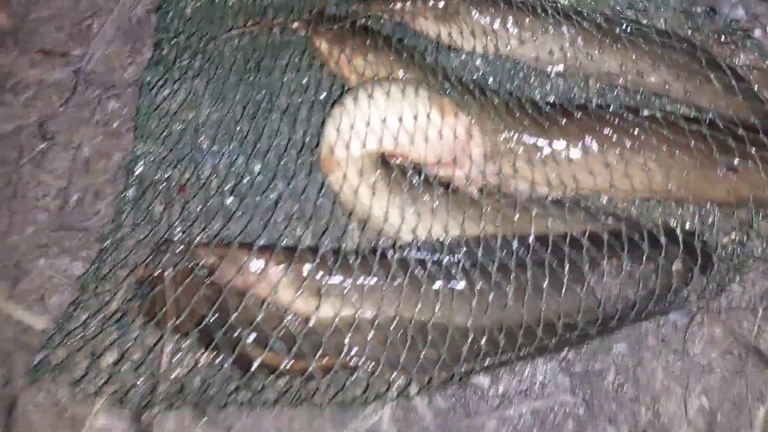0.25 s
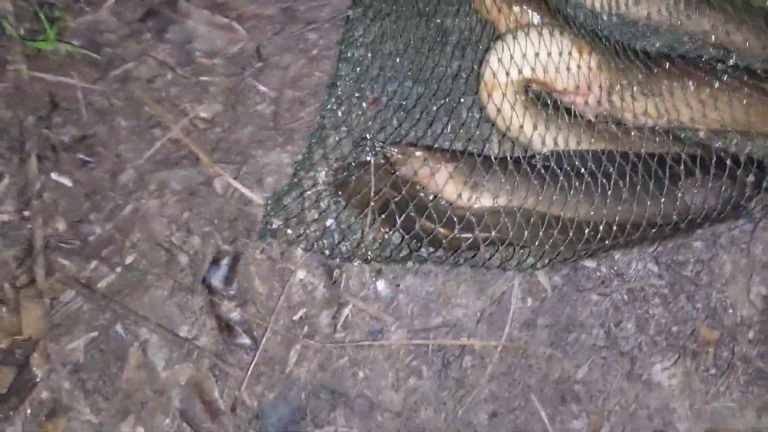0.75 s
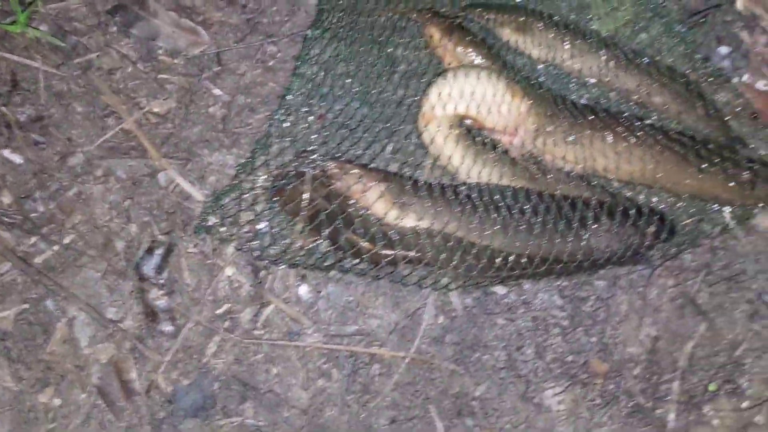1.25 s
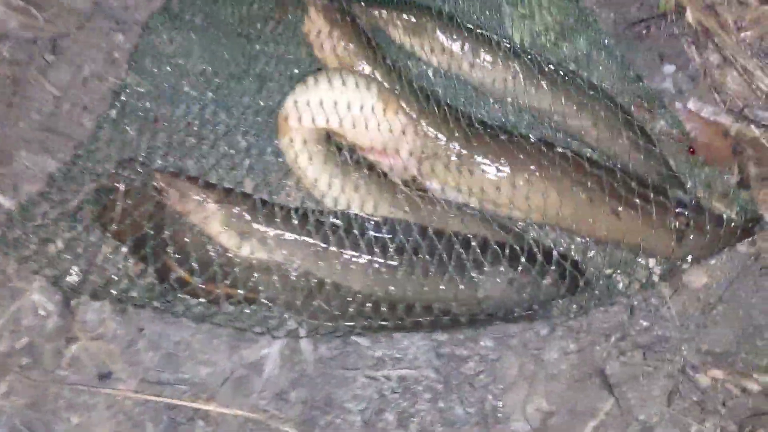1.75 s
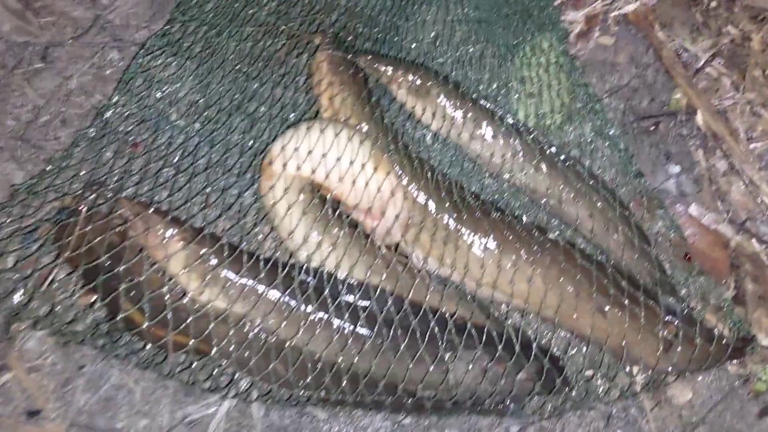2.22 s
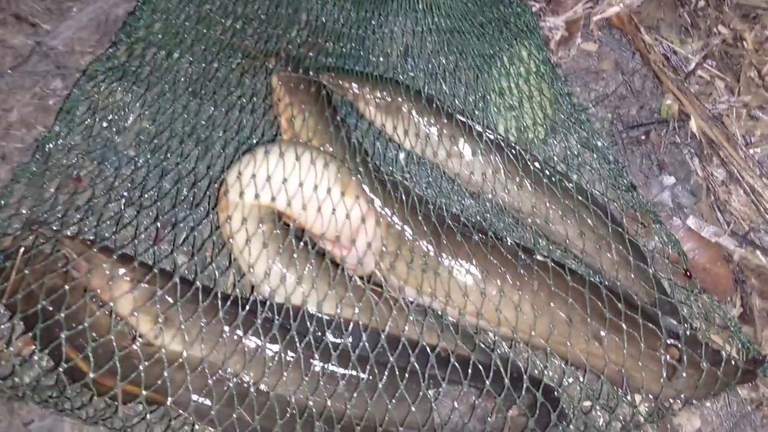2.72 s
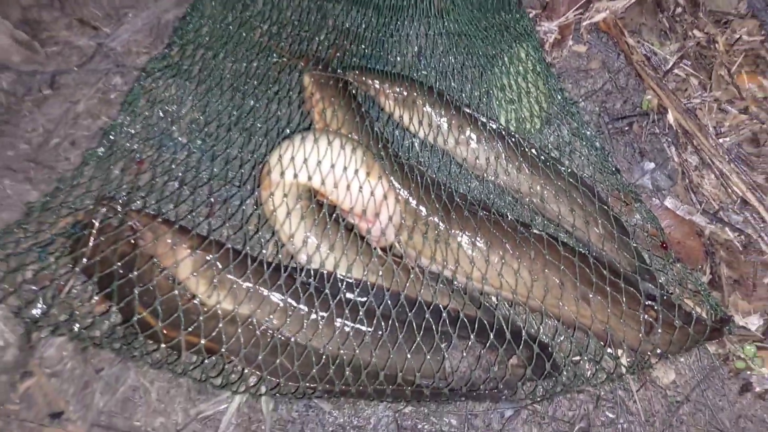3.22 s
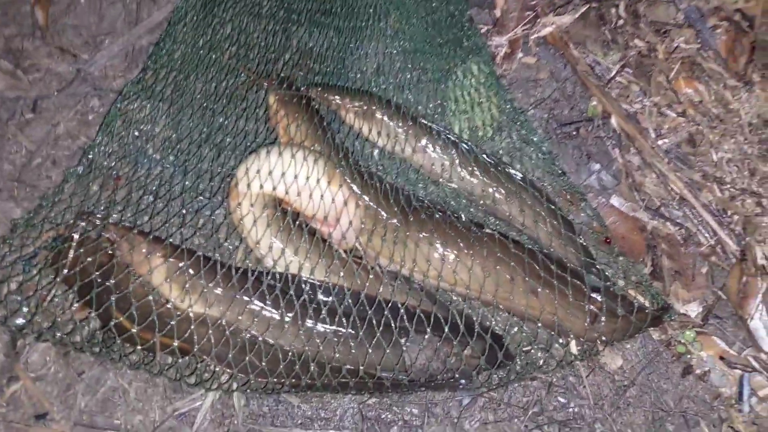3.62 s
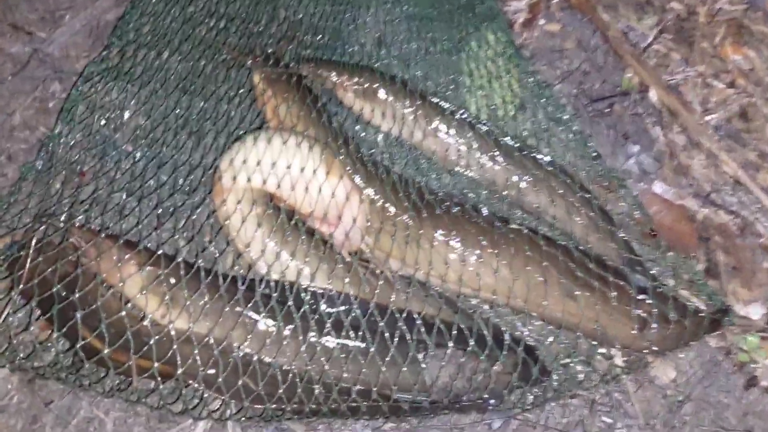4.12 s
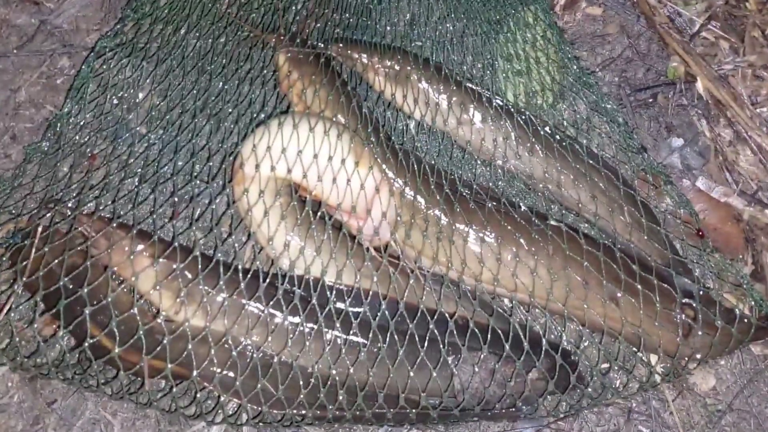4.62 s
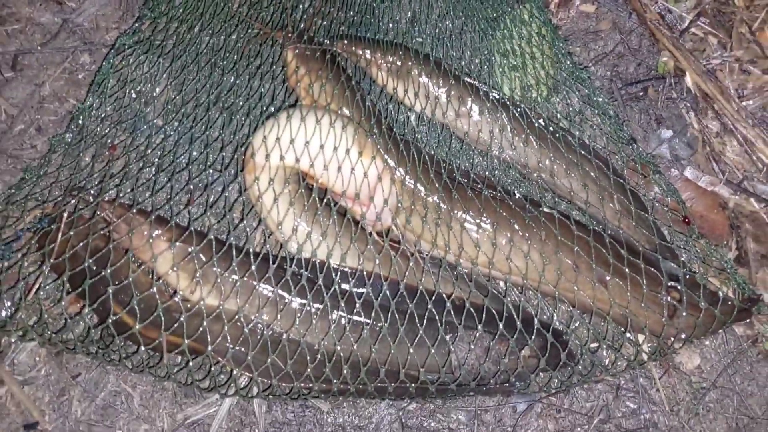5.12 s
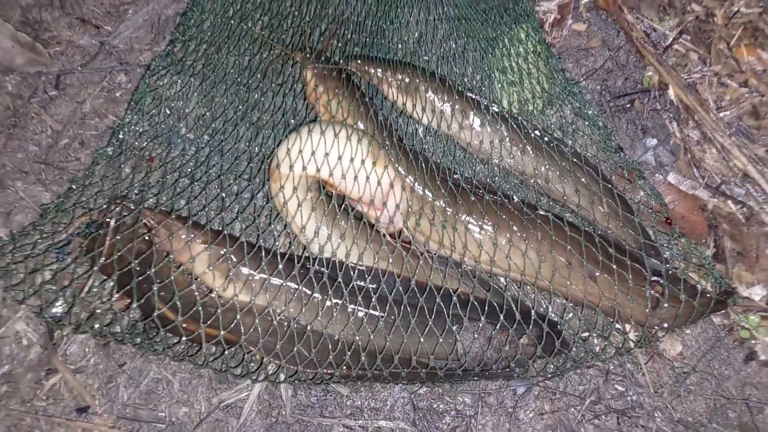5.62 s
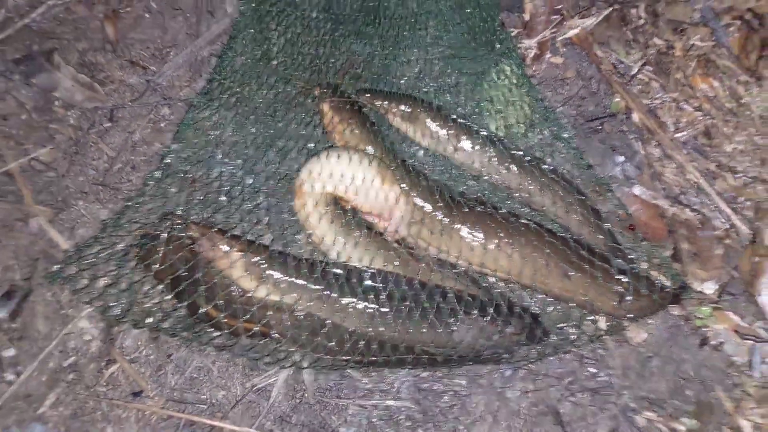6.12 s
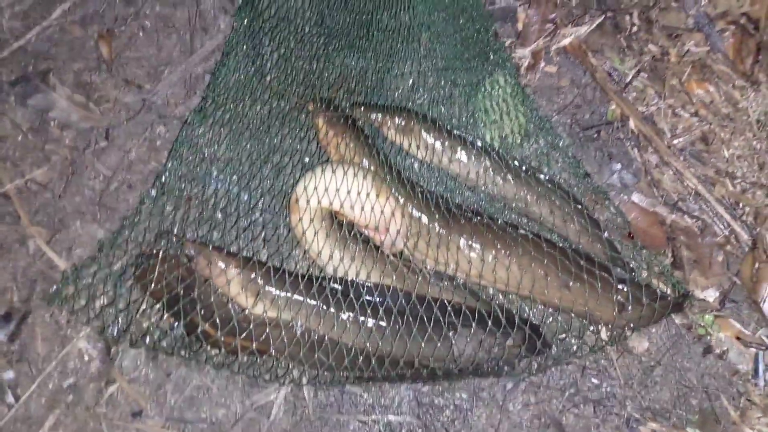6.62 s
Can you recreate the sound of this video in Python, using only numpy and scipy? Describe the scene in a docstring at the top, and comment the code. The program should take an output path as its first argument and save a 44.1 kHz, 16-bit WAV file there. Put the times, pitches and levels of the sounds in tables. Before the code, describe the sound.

Small frogs close by take turns giving short, high rattling chirps, about eight a second, each from a slightly different direction. Behind them are a cricket's even trill, a far chorus of frogs and insects, and a faint engine drone with a low rumble. Fingers tap and rub the hand-held microphone in the first two seconds. Near the end a bigger frog gives three lower croaks. It is night, outdoors by the water.

```python
"""Small frogs take turns giving short rattling chirps by the water at night, each from its own direction:
trains of glottal pulses excite the damped resonances of vocal sac and throat. Behind them are a far
chorus of frogs and insects, a cricket's wing strokes, a distant engine's drone and a low rumble.
Fingers tap and rub the hand-held recorder, whose two microphones sit a few centimetres apart,
and near the end a bigger frog croaks at lower resonances."""
import sys
import numpy as np
from scipy import signal
from scipy.fft import rfft, irfft, next_fast_len
from scipy.io import wavfile
from scipy.ndimage import uniform_filter1d, map_coordinates

SR = 44100
rng = np.random.default_rng(int(sys.argv[2]) if len(sys.argv) > 2 else 0)


def log_audio(samples):
    """Write samples as a 16-bit WAV file to the path given in sys.argv[1]."""
    # one column per channel
    frames = np.atleast_2d(samples).T
    # limit to full scale, then quantise
    limited = np.clip(frames, -1, 1)
    pcm = np.round(limited * 32767).astype(np.int16)
    wavfile.write(sys.argv[1], SR, pcm)


N = 302702
TIME = np.arange(N) / SR


def amp(db):
    return 10 ** (np.asarray(db) / 20)

def unit_rms(x):
    return x / np.sqrt(np.mean(x ** 2) + 1e-20)

def along(points, hz):
    """Interpolation of (Hz, value) points on a logarithmic frequency axis."""
    freqs, values = np.transpose(points)
    return np.interp(np.log(hz + 1), np.log(freqs + 1), values)

def curves(rows):
    """Linear interpolation in time: one envelope for each column after the first."""
    times, *columns = np.transpose(rows)
    return [np.interp(TIME, times, column) for column in columns]

def wobble(rate):
    """Smooth random modulation with `rate` knots a second."""
    return map_coordinates(rng.standard_normal(int(N * rate / SR) + 4), [TIME * rate])

def filtered(x, response):
    """Zero-phase filtering: the spectrum times a frequency response."""
    size = next_fast_len(N + SR // 2)
    return irfft(rfft(x, size) * response(np.fft.rfftfreq(size, 1 / SR)), size)[..., :N]

def ring(t, hz, db, t60, attack_s):
    """A damped mode struck at t = 0, decaying 60 dB in t60 seconds."""
    t = np.maximum(t, 0)
    return amp(db - 60 * t / t60) * np.sin(2 * np.pi * hz * t) * (1 - np.exp(-t / attack_s)) ** 2

def add(out, start_s, sound):
    """Superposition of a sound on the mix."""
    part = out[..., round(start_s * SR):][..., :sound.shape[-1]]
    part += sound[..., :part.shape[-1]]


# Reverberation of reeds and bank. Each row: frequency in Hz, t60 in seconds.
BANK_DECAY = [(1500, 0.73), (4000, 0.48), (8000, 0.3)]

def scatter(x, build_s=0.0069):
    """Diffuse reflection: reeds and bank return a tail that builds, then decays exponentially."""
    hz, t, noise = signal.stft(rng.standard_normal((2, SR // 4)), SR, nperseg=256)
    decay = amp(-60 * t / along(BANK_DECAY, hz)[:, None])
    onset = 1 - np.exp(-(t / build_s) ** 2)
    tail = signal.istft(noise * decay * onset, SR, nperseg=256)[1]
    return signal.fftconvolve(x[None], tail / np.linalg.norm(tail[0]), axes=1) * amp([[-1.8], [1.8]])

def small_body(hz):
    """Radiation efficiency: a small frog emits little below its throat modes or far above its sac."""
    return 1 / np.sqrt((1 + (1360 / (hz + 1)) ** 24) * (1 + (hz / 6200) ** 8))

# The chirps. Each row: start in seconds, frog, first pulse's gain in dB, number of pulses.
CHIRPS = [(0, "a", -6, 5), (0.1236, "a", -8, 6), (0.2428, "a", -7.5, 6), (0.3699, "a", -8.5, 7),
          (.491, "a", -8, 5), (.6167, "a", -7, 5), (0.7384, "a", -7, 5), (0.8572, "a", -7.5, 6),
          (0.9852, "a", -8.5, 6), (1.207, "b", -20, 10), (1.331, "b", -16, 5), (1.346, "b", -8.5, 9),
          (1.4669, "b", -4.5, 7), (1.619, "b", -5, 7), (1.7862, "b", -7.5, 9), (1.9494, "b", -10.5, 9),
          (2.112, "b", -11, 10), (2.2739, "b", -7.5, 8), (2.3936, "c", -10.5, 6), (2.454, "b", -7, 8),
          (2.5339, "c", -9.5, 6), (2.6789, "c", -9, 6), (2.826, "c", -8.5, 6), (2.9728, "c", -9.5, 7),
          (3.121, "c", -8, 6), (3.2647, "c", -9, 5), (3.4167, "c", -9, 5), (3.5602, "c", -9, 6),
          (3.7131, "c", -10, 6), (3.863, "c", -10.5, 7), (3.9837, "d", -14, 8), (4.0179, "c", -8.5, 5),
          (4.1038, "d", -5.5, 4), (4.223, "d", -6.5, 5), (4.3412, "d", -8.5, 6), (4.466, "d", -7.5, 5),
          (4.5875, "d", -7.5, 6), (4.7088, "d", -7, 5), (4.826, "d", -7.5, 6), (4.9446, "d", -6.5, 5),
          (5.0672, "d", -7, 5), (5.1883, "d", -9.5, 5), (5.306, "d", -9, 5), (5.423, "d", -10, 5),
          (5.5343, "d", -10.5, 5), (5.6448, "d", -11.5, 4), (5.7555, "d", -10, 5), (5.8615, "d", -10, 4),
          (5.9739, "d", -10, 5), (6.0827, "d", -9, 6), (6.187, "d", -5.5, 5), (6.299, "d", -9, 5),
          (6.3611, "e", -14, 7), (6.4011, "d", -7.5, 4), (6.5122, "d", -7, 3), (6.5252, "e", -8.5, 6),
          (6.6301, "d", -8.5, 5), (6.656, "e", -7, 7), (6.7627, "d", -7.5, 4), (6.795, "e", -7.5, 7)]
# The near frogs. Each entry: reference time in seconds, pitch in Hz, its drift in Hz/s, pulse gap in ms,
# throat gain in dB, its drift in dB/s, lag at the left microphone in ms.
FROGS = dict(a=(0.5, 3995, -3, 3, -13, 0, -0.0126), b=(1.8, 3883.5, 70, 3, -15.5, -2.5, 0.246),
         c=(2.5, 3696, -82, 3.5, -24, -6, -.135), d=(4, 3877, 30, 2.5, -13, 0.5, -0.0396),
         e=(7, 3836, -50, 2.5, -11.5, -1.5, 0.0663))
# The hand slowly turns the recorder. Each row: time in seconds, added left lag in ms.
RECORDER_TURN = [(0, 0.0094), (.95, 0.056), (1.45, 0.02), (2.2, 0.11), (4, .15), (5.15, .19), (5.6, 0.14),
                 (6.86, .13)]
# Vocal sac resonances. Each row: multiple of the pitch, gain in dB, t60 in seconds.
SAC_MODES = [(1, 3, 0.0098), (1.12, -3, 0.005), (.88, -5, 0.0042)]
# The bright edge of a pulse. Each row: frequency in Hz, gain in dB, t60 in seconds.
SNAP_MODES = [(4800, -25, 0.0021), (5460, -15, 0.0036), (5900, -20.5, 0.0026)]
# Throat resonances. Each row: frequency in Hz, gain in dB, t60 in seconds.
THROAT_MODES = [(1623, -11, 0.034), (1895, 0, 0.014), (2456, 3.5, 0.011)]

def small_frogs(jitter_ms=0.15, slowing=1.15, tiring_db=4, attack_s=0.00027, damping_t60=0.0015,
                aim_db_per_ms=52, left_db=-4, shade_db=-6, echo_db=-6):
    """Impulse excitation: glottal pulses, slowing and weakening, ring the vocal sac and throat."""
    out, t = np.zeros((2, N)), np.arange(SR // 16) / SR
    for start, frog, db, pulses in CHIRPS:
        reference_s, pitch, drift_hz, gap_ms, throat_db, drift_db, lag_ms = FROGS[frog]
        pitch += drift_hz * (start - reference_s)
        throat_db += drift_db * (start - reference_s)
        lag_ms += np.interp(start, *np.transpose(RECORDER_TURN))
        k = np.arange(pulses)[:, None]
        progress = k / k[-1]
        # Random deviations: entry k is for one pulse, the last for the whole chirp.
        timing, force, tuning, edge = rng.standard_normal((16, 4)).T
        length_ms = gap_ms * k[-1] * (1 + 0.0408 * timing[-1])
        age = t - (length_ms * progress ** slowing + jitter_ms * timing[k] * (k > 0)) / 1000
        sac_hz = pitch * (1 + 0.029 * tuning[k] + 0.0072 * tuning[-1])
        sac = sum(ring(age, sac_hz * ratio, gain, t60, attack_s) for ratio, gain, t60 in SAC_MODES)
        sac[:-1] *= amp(-60 * np.maximum(age[1:], 0) / damping_t60)  # each pulse damps the one before
        aim_db = aim_db_per_ms * lag_ms  # brighter along the microphones' axis
        snap = sum(ring(age, hz * (1 + 0.058 * edge[k]), gain + aim_db, t60, attack_s)
                   for hz, gain, t60 in SNAP_MODES)
        throat = sum(ring(age, hz, gain + throat_db, t60, 0.002) for hz, gain, t60 in THROAT_MODES)
        strength = amp(db - tiring_db * progress + 0.95 * force[k])
        call = ((sac + snap + throat) * strength).sum(axis=0)
        # The case shades the left microphone's treble.
        shaded = ((sac + amp(shade_db) * snap + throat) * strength).sum(axis=0)
        add(out[1], start, call)
        add(out[0], start + max(lag_ms, 0) / 1000, shaded * amp(left_db + 0.49 * edge[0]))
        add(out, start, amp(echo_db) * scatter(call))
    return filtered(out, small_body)


# The left microphone is less sensitive. Each row: frequency in Hz, left minus right in dB.
SENSITIVITY_GAP = [(60, -12), (180, -8.5), (550, -3.5), (1650, -1), (4970, -4.5), (15000, -1.5)]

def imbalance(hz):
    """Sensitivity mismatch, split equally between the two microphones."""
    return amp(np.outer([.5, -.5], along(SENSITIVITY_GAP, hz)))

# Likeness of far sound at the two microphones. Each row: frequency in Hz, correlation from -1 to 1.
COHERENCE = [(60, 0.88), (180, 0.97), (550, 0.28), (1650, -0.23), (4970, -0.043), (15000, 0.047)]

def diffuse_field(spectrum, patchy_db, grain_db, grain_rate):
    """Incoherent summation: many far sources blur into patchy, grainy noise, partly alike in stereo."""
    def mid_side(hz):
        angle = np.arccos(np.clip(along(COHERENCE, hz), -1, 1)) / 2
        return amp(along(spectrum, hz)) * [np.cos(angle), np.sin(angle)]

    noise = signal.stft(rng.standard_normal((2, N)), nperseg=512)[2]
    patches = uniform_filter1d(rng.standard_normal(noise.shape[1:]), size=5, axis=0)
    patches = unit_rms(uniform_filter1d(patches, size=10, axis=1))
    pair = signal.istft(noise * amp(patchy_db * patches), nperseg=512)[1][:, :N]
    grains = amp(grain_db * np.array([wobble(grain_rate), wobble(grain_rate)]))
    mid, side = filtered(pair * grains, mid_side)
    return unit_rms(filtered(np.array([mid + side, mid - side]), imbalance))

# Swells of the chorus. Each row: time in seconds, then far frog, cricket and far throat levels in dB.
CHORUS_LEVELS = [(0.0, -42, -43.5, -56), (0.85, -54, -39, -56), (1.12, -48, -46, -60),
                 (1.3, -44, -45, -49.5), (1.55, -32, -39, -47), (3.44, -41.5, -43, -49.5),
                 (4.47, -39, -43.5, -57), (5.83, -46.5, -46, -54.5), (6.86, -29, -39.5, -39.5)]
# Swells of the katydids. Each row: time in seconds, level in dB.
KATYDID_LEVELS = [(0, -36.5), (1.2, -37.5), (1.6, -37), (3.2, -37.5), (3.5, -41.5), (6, -41.5), (6.86, -38)]
# Spectra of four far crowds. Each row: frequency in Hz, relative spectral density in dB.
FAR_FROGS = [(2200, -37.5), (2700, -19.5), (3300, -3), (3850, 4), (4300, 0), (4800, -6), (5500, -9.5),
             (6200, -37)]
FAR_THROATS = [(1100, -48), (1250, -8), (1450, 4.5), (2000, 0.5), (2800, 5.5), (3400, -40)]
TREE_CRICKETS = [(5400, -41.5), (6100, -10), (6350, -0.5), (6600, 5), (6850, -5.5), (7300, -29)]
KATYDIDS = [(5000, -22), (5800, -10), (6900, -1), (7500, 0.5), (8500, -3), (10500, -11), (14600, -12),
            (15600, -17.5)]

def chorus(tree_cricket_db=-42):
    """Superposition: far frogs and insects merge into bands of noise around one nearer cricket."""
    frogs_db, cricket_db, throats_db = curves(CHORUS_LEVELS)
    katydids_db, = curves(KATYDID_LEVELS)
    frogs = amp(frogs_db + 0.13 * wobble(7)) * diffuse_field(FAR_FROGS, 1.1, 1.5, grain_rate=310)
    throats = amp(throats_db) * diffuse_field(FAR_THROATS, 3.5, 4, grain_rate=79)
    tree_gain = amp(tree_cricket_db + 0.83 * wobble(1.8))
    tree_crickets = tree_gain * diffuse_field(TREE_CRICKETS, 0.9, 0.8, grain_rate=76)
    katydids = amp(katydids_db + wobble(4.77)) * diffuse_field(KATYDIDS, 1.37, 0.5, grain_rate=140)
    return frogs + throats + tree_crickets + katydids + amp(cricket_db) * cricket()

def cricket(wing_hz=4420, strokes_per_s=78, t60=0.013):
    """Stridulation: an even trill of strokes rings the wing, and scattering smears it on its way."""
    stroke_count = np.floor(np.cumsum(strokes_per_s * (1 + 0.043 * wobble(8.7))) / SR)
    strokes = np.diff(stroke_count, prepend=0) * amp(wobble(30))
    wing_mode = ring(np.arange(SR // 20) / SR, wing_hz, 0, t60, attack_s=0.007)
    trill = signal.fftconvolve(strokes, wing_mode)[:N]
    return unit_rms(trill * amp([[-2], [2]]) + 2 * scatter(trill)[:, :N])


# Swells of the engine's partials. Each row: time in seconds, then firing, middle and upper levels in dB.
ENGINE_LEVELS = [(0, -66, -38.5, -47), (.6, -58, -50, -53.5), (1.4, -47, -42.5, -47.5),
                 (2, -42, -53.5, -52.5), (2.87, -37.5, -60, -41.5), (3.4, -49, -64, -50.5),
                 (4.1, -45.5, -54, -48), (4.6, -45, -62, -59), (4.9, -36, -50, -47.5),
                 (5.53, -44, -50.5, -55.5), (5.85, -38, -48, -41.5), (6.05, -37, -49, -46),
                 (6.33, -47, -48.5, -52), (6.86, -49.5, -59, -66)]

def engine(firing_hz=80.96, slowing_hz_per_s=1.55):
    """Periodic firing: three wavering partials sink in pitch as a far engine steadily runs down."""
    def partial(ratio, db, waver_db):
        gain = amp(db + waver_db * wobble(4.8))
        hz = ratio * (firing_hz - slowing_hz_per_s * TIME) * (1 + 0.01481 * wobble(8))
        return gain * np.sin(2 * np.pi * np.cumsum(hz) / SR)

    firing_db, middle_db, upper_db = curves(ENGINE_LEVELS)
    drone = partial(1, firing_db, 0.6) + partial(2.42, upper_db, 1.8) + partial(1.77, middle_db, 1.1)
    return filtered(drone, imbalance)

# Low night air and traffic. Each row: frequency in Hz, relative spectral density in dB.
AIR_SPECTRUM = [(15, -60), (27, -14), (57, -5.5), (74, -1.5), (86, -5), (102, -4.5), (144, -7.5), (179, -8),
                (245, -15), (358, -24.5), (402, -27.5), (998, -54), (1300, -73), (1690, -42), (2860, -120)]

def rumble(db=-40, fade_db_per_s=0.6):
    """Ambient noise: night air and traffic form a low diffuse field that slowly fades."""
    air = diffuse_field(AIR_SPECTRUM, patchy_db=0.7, grain_db=0.3, grain_rate=40)
    return amp(db - fade_db_per_s * TIME + 0.9 * wobble(2.54)) * air

def lull(centre_s=3.63, half_width_s=0.059, depth_db=-8):
    """Amplitude modulation: the level dips briefly along a bell curve."""
    return amp(depth_db * np.exp(-((TIME - centre_s) / half_width_s) ** 2))


# Taps on the case. Each row: start in seconds, level in dB, pitch in Hz, thud relative to tap in dB.
TAPS = [(0.163, -32.5, 405, -17), (0.398, -28.5, 405, -11), (0.84, -25, 684, -6), (0.86, -31, 730, -18),
        (1.449, -34, 746, -8), (1.49, -24.5, 820, 6), (1.512, -22, 750, -19), (1.537, -26, 694, -27),
        (1.594, -19.5, 770, -22), (1.639, -24, 920, -24), (1.669, -36, 1000, -21), (1.693, -26, 980, -18),
        (1.707, -13.5, 567, -2.5), (1.721, -18.5, 640, -1), (1.757, -21.5, 516, 5.5), (1.796, -26, 747, -3),
        (1.863, -27, 1340, -24), (1.877, -34, 910, -17), (2.513, -37, 800, -13)]
# Modes of the whole case. Each row: frequency in Hz, gain in dB, t60 in seconds.
THUD_MODES = [(269, 2, 0.026), (120, -0.5, 0.03)]

def finger_taps(tap_t60=0.024, attack_s=0.002):
    """Impact excitation: soft skin rings the hollow case and rocks it with a thud."""
    out, t = np.zeros((2, N)), np.arange(SR // 12) / SR
    for start, db, pitch, thud_db in TAPS:
        tap = ring(t, pitch, db, tap_t60, attack_s) + ring(t, pitch * 1.33, db - 13.5, 0.043, attack_s)
        dull_contact = uniform_filter1d(rng.standard_normal(len(t)), size=7)
        tap += amp(db - 10.5 - 60 * t / tap_t60) * dull_contact
        thud = sum(ring(t, hz, db + thud_db + gain, t60, 0.0016) for hz, gain, t60 in THUD_MODES)
        rocking = thud * np.array([[-.3], [1.3]])  # pushes the two microphones unequally
        add(out, start, tap * amp([[-1.5], [1.5]]) + rocking)
    return out

# Skin sliding on the case. Each row: time in seconds, level in dB.
RUB_LEVELS = [(1.43, -57), (1.52, -33.5), (1.6, -50), (1.68, -37), (1.731, -32), (1.82, -45.5), (1.9, -53)]

def finger_rub():
    """Sliding friction: skin on the case makes gritty noise, strongest near 750 Hz."""
    rub_db, = curves([(RUB_LEVELS[0][0] - 0.03, -100), *RUB_LEVELS, (RUB_LEVELS[-1][0] + 0.034, -100)])
    grit = (rng.standard_normal(N) + 1.05 * rng.standard_normal((2, N))) * amp(2.7 * wobble(150))
    spectrum = [(150, -13), (350, -12.5), (750, -1.5), (1100, -10), (1800, -7.5), (3000, -8), (9000, -20)]
    return amp(rub_db) * unit_rms(filtered(grit, lambda hz: amp(along(spectrum, hz))))


# The bigger frog's croaks. Each row: start in seconds, level in dB, pulse train length in seconds.
CROAKS = [(6.531, -20, .024), (6.646, -21.5, .026), (6.812, -20.5, .032)]
# Its vocal sac resonances. Each row: frequency in Hz, gain in dB, t60 in seconds.
CROAK_MODES = [(1240, -13, 0.022), (1464, 4.5, 0.022), (1764, 2, 0.018)]

def big_frog(gap_s=0.0073, jitter_s=0.00109, echo_db=-16):
    """Resonance falls with size: glottal pulses ring the lower modes of a bigger sac."""
    out, t = np.zeros((2, N)), np.arange(SR // 10) / SR
    for start, db, length in CROAKS:
        onsets = np.arange(0, length, gap_s)[:, None]
        onsets += jitter_s * rng.standard_normal((20, 1))[:len(onsets)]
        pulses = sum(ring(t - onsets, hz, db + gain, t60, 0.0031) for hz, gain, t60 in CROAK_MODES)
        call = pulses.sum(axis=0)
        add(out, start, call * amp([[-2], [2]]))
        add(out, start, amp(echo_db) * scatter(call))
    return out


def scene():
    """Linear superposition of all sources at the two microphones."""
    animals = small_frogs() + big_frog() + chorus()
    low_sounds = (engine() + rumble()) * lull()
    return animals + low_sounds + finger_taps() + finger_rub()

def record(dry):
    """Band limiting: the recorder keeps nothing above 15650 Hz."""
    return filtered(dry, lambda hz: hz < 15650)


dry = scene()
out = record(dry)
log_audio(out)
```